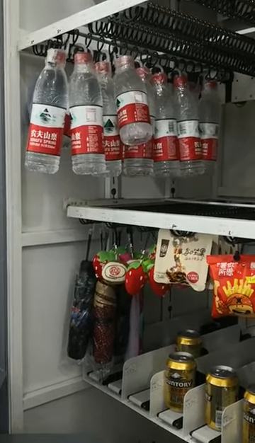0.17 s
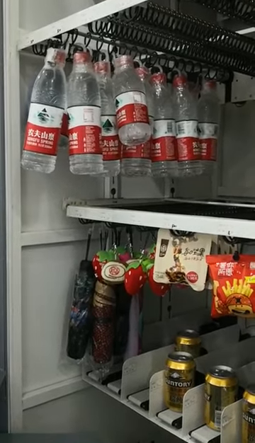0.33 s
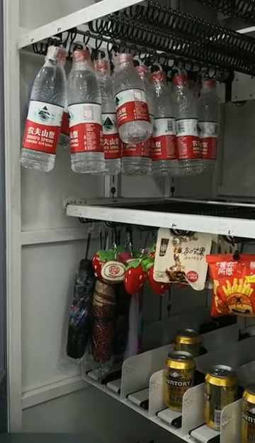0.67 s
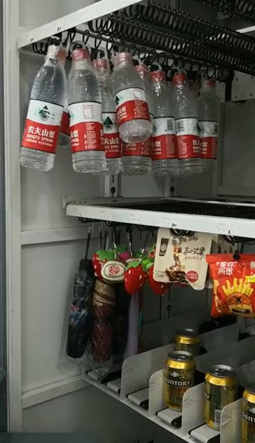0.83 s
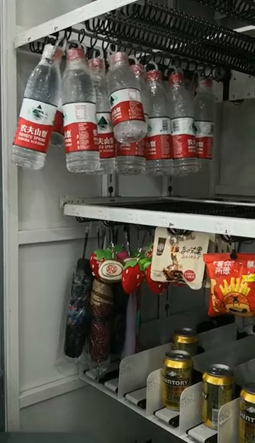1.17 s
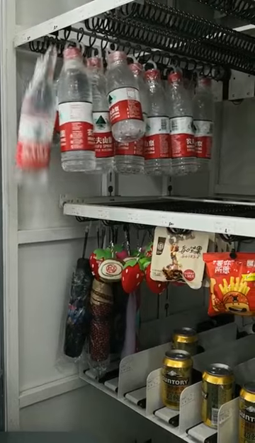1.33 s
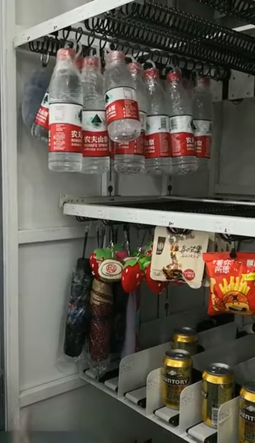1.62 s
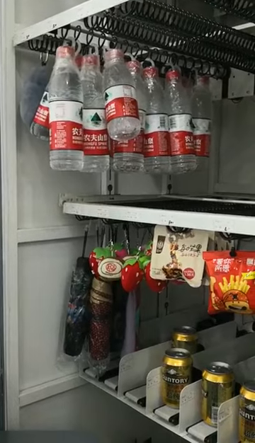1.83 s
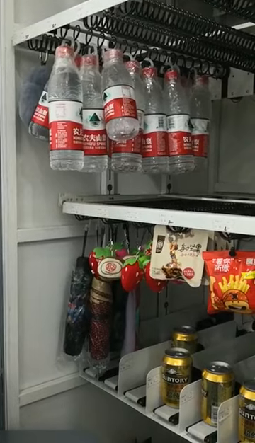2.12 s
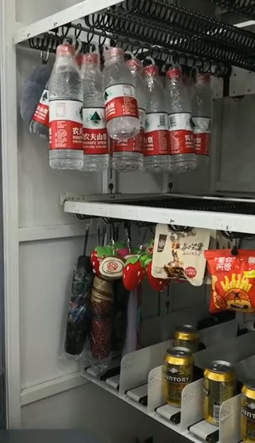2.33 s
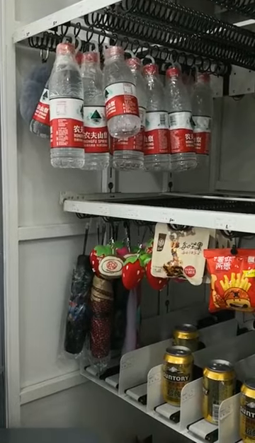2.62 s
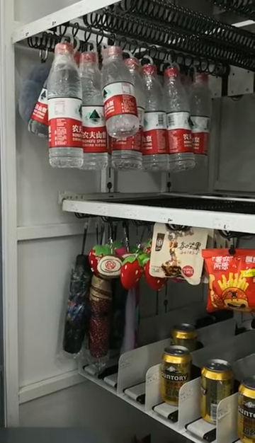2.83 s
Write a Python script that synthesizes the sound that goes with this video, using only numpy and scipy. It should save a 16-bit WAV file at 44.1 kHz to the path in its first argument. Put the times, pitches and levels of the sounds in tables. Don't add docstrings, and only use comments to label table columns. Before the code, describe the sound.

Vending machine motor whining and buzzing, then a loud clattering bottle drop, and the motor restarts.

```python
import sys
import numpy as np
from scipy import signal
from scipy.fft import rfft, irfft, next_fast_len
from scipy.io import wavfile
from scipy.ndimage import uniform_filter1d, map_coordinates

SR = 44100
rng = np.random.default_rng(int(sys.argv[2]) if len(sys.argv) > 2 else 0)


def magnitude_from_level(level_db):
    exponent = np.asarray(level_db, float) / 20
    return 10 ** exponent


def generate_wav(signal):
    frames = np.transpose(np.atleast_2d(signal))
    scaled = np.clip(frames, -1, 1) * 32767
    pcm = np.round(scaled).astype(np.int16)
    wavfile.write(sys.argv[1], SR, pcm)


N = 131859
TIME = np.arange(N) / SR
HALVES = np.array([[.5], [-.5]])
RESTART_S = 2.59


def unit(x):
    return x / np.sqrt(np.mean(x ** 2) + 1e-20)


def along(points, hz):
    f, v = np.transpose(points)
    return np.interp(np.log(hz + 1), np.log(f + 1), v)


def curves(rows):
    s, *cols = np.transpose(rows)
    return [np.interp(TIME, s, c) for c in cols]


def wobble(rate):
    return map_coordinates(rng.standard_normal(N // 8), [np.arange(N) * rate / SR])


def filtered(x, response):
    m = next_fast_len(N + SR // 2)
    return irfft(rfft(x, m) * response(np.fft.rfftfreq(m, 1 / SR)), m)[..., :N]


def ports(pair, alike, lean):
    def mixing(hz):
        angle = np.arccos(np.clip(along(alike, hz), -1, 1)) / 2
        return np.array([np.cos(angle), np.sin(angle)])

    mid, side = filtered(pair, mixing)
    return filtered(np.array([mid + side, mid - side]), lambda hz: magnitude_from_level(HALVES * along(lean, hz)))


def patchy(patch_db, size=5):
    z = signal.stft(rng.standard_normal((2, N + 512)), nperseg=512)[2]
    field = uniform_filter1d(rng.standard_normal(z.shape[1:]), size=size, axis=0)
    field = uniform_filter1d(field, size=6, axis=1)
    return signal.istft(z * magnitude_from_level(patch_db * unit(field)), nperseg=512)[1][:, :N]


def swells(rows):
    total = 0
    for s, length_s, hz, db in rows:
        envelope = np.sin(np.pi * np.clip((TIME - s) / length_s, 0, 1) ** 0.47)
        tone = np.sin(2 * np.pi * hz * TIME + .7 * wobble(30))
        total = total + np.sqrt(2) * magnitude_from_level(db) * envelope * tone
    return total


# frequency in Hz, left-right likeness from -1 to 1.
MOTOR_ALIKE = [(30, .999), (94, .998), (150, .98), (230, .87), (360, .24), (560, -.33), (880, -.11),
               (1380, .4), (2020, .1), (4090, .15), (8270, .4)]
# frequency in Hz, left minus right in dB.
MOTOR_LEAN = [(400, 0), (930, .5), (1600, -4), (2770, -2.5), (8270, -1.5)]
SHAFT_MULTIPLES = [1, 7, 7.5, 9, 10, 11, 14, 15, 17, 18, 19, 19.45, 19.72, 20, 20.28, 20.56, 21, 22, 40,
                   42.76, 43.85, 44.74]
# level in dB, left lead in radians.
ORDER_LEVELS = [(-60.5, -0.5), (-67, 0.5), (-66.5, 1), (-62, 0), (-44.5, 1), (-56.5, 1.5), (-62.5, -1),
                (-52.5, -2), (-52, -1.3), (-54, -1.5), (-52, -2.1), (-50.5, -1.1), (-51, -1.1),
                (-38.5, -1.1), (-44.5, -1.1), (-52, -1.1), (-55, 1), (-58, 1), (-44, 1.6), (-48.5, 1),
                (-49.5, -1), (-48.5, -1)]


def whine(shaft_hz, turn):
    slow_gear_hz, gear_depth = 46, .05
    unloaded_db = -4
    gear = 1 + gear_depth * np.cos(turn * slow_gear_hz / shaft_hz[0] + 0.27 * wobble(14))
    tones = 0
    for k, (db, lead) in zip(SHAFT_MULTIPLES, ORDER_LEVELS):
        sway_db = 4 if k > 39 else 3
        level_db = db + unloaded_db * (k == 10) * (TIME > RESTART_S) + sway_db * wobble(16)
        level_db = level_db + HALVES * along(MOTOR_LEAN, k * shaft_hz[0])
        phase = k * turn + rng.uniform(0, 2 * np.pi) + HALVES * lead
        tones = tones + np.sqrt(2) * magnitude_from_level(level_db) * np.sin(phase)
    fade_db = -.45 * np.clip(shaft_hz[0] - shaft_hz, 0, None)
    return gear * tones * magnitude_from_level(fade_db)


# centre in Hz, width in Hz, level in dB.
HOUSING_MODES = [(1177, 160, -17), (1647, 164, -13.5), (2054, 320, -15.5), (2470, 110, -20),
                 (2850, 386, -12), (3185, 430, -11.5), (3757, 310, -15), (4246, 420, -15.5),
                 (4830, 450, -8.5), (5740, 1300, -13), (6450, 960, -11.5), (6936, 290, -1), (7130, 200, -2),
                 (7418, 190, -3)]


def brushes(turn):
    gate = (1 + .15 * np.cos(turn)) * magnitude_from_level(1.6 * wobble(220) + 0.37 * wobble(15))

    def housing(hz):
        power = sum(magnitude_from_level(2 * db) / (1 + (2 * (hz - centre) / width) ** 4)
                    for centre, width, db in HOUSING_MODES)
        return np.sqrt(power) / (1 + (1296 / (hz + 1)) ** 12)

    noise = unit(filtered(gate * patchy(patch_db=1), housing))
    return magnitude_from_level(-31) * ports(noise, MOTOR_ALIKE, MOTOR_LEAN)


# time in seconds, level in dB.
MOTOR_LEVEL = [(0, 3), (.3, 2.5), (.68, 3.5), (1.15, 3.5), (1.52, 2.5), (1.7, 4), (1.73, -4), (2.3, -8),
               (2.36, -15), (2.585, -18), (2.612, 1.5), (2.655, 0.5), (2.69, -0.5), (2.74, 1.5),
               (2.99, 2.5)]
# time in seconds, shaft rate in Hz.
SHAFT_SPEED = [(0, 161.8), (.12, 161.5), (.45, 161.4), (.7, 161.1), (.8, 160.7), (.87, 160), (.95, 160.9),
               (1.26, 161.4), (1.42, 162), (1.57, 162.9), (1.7, 163.3), (2.3, 163.3), (2.585, 90),
               (2.63, 120), (2.65, 149), (2.686, 159.4), (2.732, 163), (2.99, 162.6)]
# time in seconds, half length in seconds.
HISS_DROPOUTS = [(.198, .009), (.215, .009), (.345, .006), (.395, .003), (.537, .007), (.622, .006),
                 (.92, .006), (1.201, .007), (1.604, .008), (1.668, .007), (2.868, .014)]


def motor():
    (shaft_hz,), (level_db,) = curves(SHAFT_SPEED), curves(MOTOR_LEVEL)
    turn = 2 * np.pi * np.cumsum(shaft_hz + .15 * wobble(39.75)) / SR
    both = whine(shaft_hz, turn) + brushes(turn)
    top = filtered(both, lambda hz: 1 / (1 + (6900 / (hz + 100)) ** 90))
    falter_db = -24 * sum(np.exp(-((TIME - s) / half_s) ** 2) for s, half_s in HISS_DROPOUTS)
    return magnitude_from_level(level_db) * (both - top + top * magnitude_from_level(falter_db))


def shaken(blow_s, levels_db, tone, rise_s, first_s, long_s, long_db, grit_db, patch_db):
    t = np.arange(SR + SR // 2) / SR
    strikes = np.zeros(N)
    strikes[np.round(blow_s * SR).astype(int)] = magnitude_from_level(2 * levels_db)
    decay = magnitude_from_level(-120 * t / first_s) + magnitude_from_level(2 * long_db - 120 * t / long_s)
    burst = decay * (1 - np.exp(-t / rise_s)) ** 2
    power = np.abs(signal.fftconvolve(strikes, burst / burst.max())[:N])
    contacts = patchy(patch_db, size=2) * magnitude_from_level(grit_db * np.array([wobble(400), wobble(400)]))

    def colour(hz):
        return magnitude_from_level(along([(0, -120)] + tone + [(SR / 2, -120)], hz))

    return filtered(contacts * np.sqrt(power), colour) / np.std(filtered(contacts, colour))


# time in seconds, then clatter, crackle, drum and boom levels in dB.
BOTTLE_BLOWS = [(1.703, -19, -22, -27, -33), (1.72, -16, -19.5, -23.5, -40.5),
                (1.76, -17.5, -23.5, -20.5, -39), (1.792, -16.5, -25.5, -20.5, -44.5),
                (1.824, -18, -15, -24.5, -29), (1.861, -19.5, -45.5, -20.5, -46),
                (1.894, -17, -25, -24.5, -33), (1.921, -34.5, -37.5, -31.5, -23),
                (1.963, -23.5, -39, -20, -44.5), (1.993, -20, -28, -38.5, -26.5),
                (2.04, -20, -32, -18.5, -26.5), (2.07, -19, -25.5, -32, -21), (2.118, -22.5, -39, -21, -27),
                (2.155, -23, -52, -28.5, -36), (2.196, -23, -51, -28.5, -18),
                (2.222, -21, -26.5, -36.5, -47), (2.247, -16.5, -23.5, -19.5, -43.5),
                (2.288, -23, -25.5, -24, -28.5), (2.374, -23, -56.5, -23, -30.5),
                (2.41, -27, -59.5, -29.5, -32), (2.489, -52, -54, -39.5, -49.5),
                (2.583, -34.5, -66, -33, -30), (2.62, -30, -53.5, -27.5, -41.5),
                (2.647, -29, -50, -31.5, -33.5)]
# rise in seconds, first shake t60 in seconds, long shake t60 in seconds,
# long shake in dB, grit in dB, mode patches in dB.
CLATTER_DECAY = (.006, .22, .9, -8, 1.3, 3.5)
CRACKLE_DECAY = (.014, .15, .45, -13, 2, 1.5)
DRUM_DECAY = (.006, .35, 1.2, -8, 1, 3)
BOOM_DECAY = (.01, .35, 2.2, -8, 1, 1.5)
# frequency in Hz, level in dB per Hz.
CLATTER_SPECTRUM = [(400, -41.5), (600, -3.5), (900, -4), (1300, -6.5), (1800, -1.5), (2700, -4),
                    (3600, -10.5), (5500, -18)]
CRACKLE_SPECTRUM = [(2500, -17.5), (3500, 1.5), (4800, -1.5), (5700, -7.5), (6600, -2.5), (7200, 2),
                    (7600, -4.5)]
DRUM_SPECTRUM = [(90, -29.5), (130, -8), (170, -5), (260, -10), (340, -8), (420, -16), (500, -13.5),
                 (700, -29.5)]
BOOM_SPECTRUM = [(20, -45), (32, -14), (43, 0), (55, -3), (70, -2), (100, -6), (140, -30)]
# frequency in Hz, left-right likeness from -1 to 1.
BIN_ALIKE = [(40, .9995), (80, .992), (150, .99), (230, .9), (360, .42), (560, -.35), (880, -.35),
             (1380, .14), (2020, 0), (4090, .1), (8270, .3)]
# frequency in Hz, left minus right in dB.
BIN_LEAN = [(400, 0), (600, -3), (4780, -2.5), (8270, -1)]


def bottle():
    blow_s, clatter, crackle, drum, boom = np.transpose(BOTTLE_BLOWS)
    pair = shaken(blow_s, clatter, CLATTER_SPECTRUM, *CLATTER_DECAY)
    pair = pair + shaken(blow_s, crackle, CRACKLE_SPECTRUM, *CRACKLE_DECAY)
    pair = pair + shaken(blow_s, drum, DRUM_SPECTRUM, *DRUM_DECAY)
    pair = pair + shaken(blow_s, boom, BOOM_SPECTRUM, *BOOM_DECAY)
    return ports(pair, BIN_ALIKE, BIN_LEAN)


# time in seconds, peak in dB, mode in Hz, t60 in seconds.
CONTACTS = [(1.712, -6.5, 3550, 0.04), (1.7234, -5, 2750, 0.038), (1.7414, -7.5, 2770, 0.04),
            (1.7964, -9.5, 1560, 0.044), (1.8364, -11, 1740, 0.056), (1.8614, -8, 1740, 0.04),
            (1.8924, -8, 2010, 0.04), (1.9224, -13, 1840, 0.044), (2.0344, -12, 1500, 0.04),
            (2.0564, -14, 1540, 0.038), (2.0654, -11, 1950, 0.043), (2.0847, -9.5, 2380, 0.05),
            (2.1054, -11, 1120, 0.05), (2.2548, -8, 2200, 0.04), (2.4189, -11, 2080, 0.046),
            (2.4984, -21, 1610, 0.035), (2.595, -25, 1975, 0.04), (2.6034, -26, 1880, 0.04),
            (2.613, -22, 1770, 0.04), (2.6214, -27, 1710, 0.029), (2.6489, -19, 1577, 0.034)]


def knocks():
    out = np.zeros((2, N + SR))
    t = np.arange(SR // 8) / SR
    for s, db, hz, t60 in CONTACTS:
        waver = np.cumsum(rng.standard_normal((2, len(t))), axis=1) * .04
        ring = magnitude_from_level(-60 * t / t60) * (1 - np.exp(-t / .001)) * np.sin(2 * np.pi * hz * t + waver)
        click = magnitude_from_level(-6 - 60 * t / .006) * rng.standard_normal((2, len(t)))
        start = round(s * SR)
        out[:, start:start + len(t)] += magnitude_from_level(db - 6) * (ring + click)
    low_cut = filtered(out[:, :N], lambda hz: 1 / (1 + (500 / (hz + 1)) ** 4))
    return low_cut * magnitude_from_level([[-1.3], [1.3]])


# start in seconds, length in seconds, frequency in Hz, level in dB.
PANEL_RINGS = [(1.7, 0.15, 196.1, -28.5), (1.7, 0.16, 719, -30.5), (1.903, 0.16, 345, -22.5),
               (2.24, 0.053, 343, -30), (2.36, 0.11, 155, -21), (2.78, 0.37, 20, -34),
               (2.625, 0.063, 2210, -41), (2.1, 0.061, 2740, -43), (2.65, .04, 1600, -39),
               (2.7, 0.067, 1300, -43), (2.3, .09, 45, -26.5), (1.715, 0.18, 59, -30),
               (1.82, 0.032, 950, -36), (1.76, 0.052, 2500, -28)]


def panels():
    return swells(PANEL_RINGS)


# time in seconds, pitch in Hz, level in dB.
COIL_SQUEAK = [
    (.65, 1910, -54),
    (.69, 1930, -41),
    (.745, 1930, -35),
    (.77, 1955, -35),
    (.81, 1965, -39),
    (.84, 1950, -38),
    (.875, 1975, -39),
    (.89, 1975, -50),
    (.94, 1960, -50),
]
STICK_S = [
    .788,
    .826,
    .855,
    .896,
]
STICK_DB = [
    8,
    22,
    10,
    15,
]
# start in seconds, length in seconds, frequency in Hz, level in dB.
FRAME_GROANS = [
    (.86, 0.081, 75, -53),
    (1.0, 0.18, 75.4, -52.5),
    (1.3, 0.23, 64.7, -50),
    (1.33, 0.21, 196.2, -48),
]


def coil():
    hz, db = curves(COIL_SQUEAK)
    on = uniform_filter1d(1. * (TIME > COIL_SQUEAK[0][0]) * (TIME < COIL_SQUEAK[-1][0]), size=600)
    gap_db = sum(deep * np.exp(-((TIME - s) / .005) ** 2) for s, deep in zip(STICK_S, STICK_DB))
    level = on * magnitude_from_level(-gap_db) * np.sqrt(2) * magnitude_from_level(db + 1.5 * wobble(60))
    squeak = level * np.sin(2 * np.pi * np.cumsum(hz + 5 * wobble(50)) / SR)
    return squeak * magnitude_from_level([[-1.5], [1.5]]) + swells(FRAME_GROANS)


def slip():
    start_hz, end_hz, length_s = 2000, 1580, .075
    u = np.clip((TIME - RESTART_S) / length_s, 0, 1)
    phase = 2 * np.pi * np.cumsum(end_hz + (start_hz - end_hz) * (1 - u) ** 2) / SR

    def rough():
        return (1 + .5 * wobble(130)) * np.sin(phase) + .5 * wobble(110) * np.cos(phase)

    return magnitude_from_level(-33) * np.sin(np.pi * np.sqrt(u)) * np.array([rough(), rough()])


# frequency in Hz, level in dB per Hz.
RUMBLE_SPECTRUM = [(15, -42), (25, -13), (70, -9.5), (128, -16), (199, -16.5), (603, -31.5), (663, -23),
                   (1050, -30), (1100, -20.5), (1430, -39.5), (2420, -120)]


def floor():
    pair = unit(filtered(patchy(patch_db=4.0, size=3), lambda hz: magnitude_from_level(along(RUMBLE_SPECTRUM, hz))))
    return magnitude_from_level(-54 + 0.83 * wobble(5.3)) * ports(pair, MOTOR_ALIKE, MOTOR_LEAN)


def scene():
    return motor() + bottle() + knocks() + panels() + coil() + slip() + floor()


def top_cut(x):
    return signal.sosfilt(signal.butter(12, 8870, fs=SR, output="sos"), x)


def record(dry):
    soft = dry / (1 + np.abs(dry / .95) ** 4) ** (1 / 4)
    mix = filtered(soft, lambda hz: 1 / (1 + (hz / 7530) ** 300))
    return top_cut(mix)


dry = scene()
out = record(dry)
generate_wav(out)
```